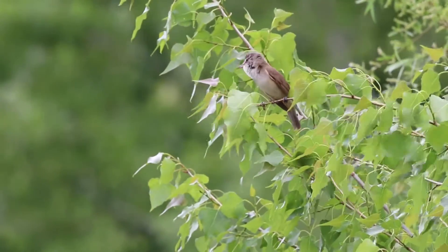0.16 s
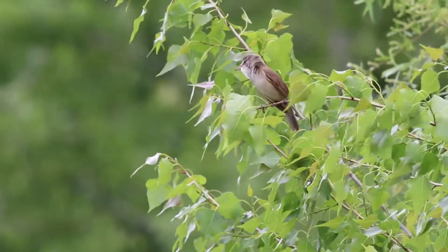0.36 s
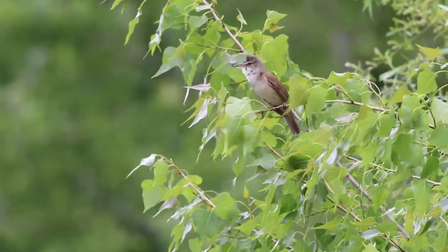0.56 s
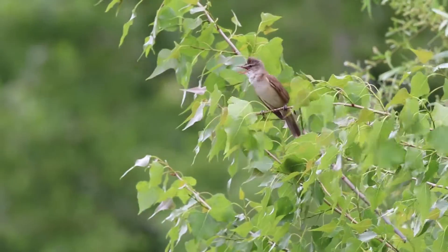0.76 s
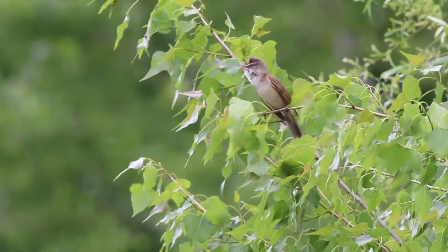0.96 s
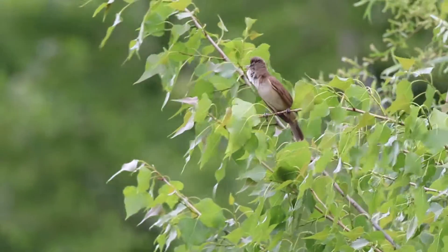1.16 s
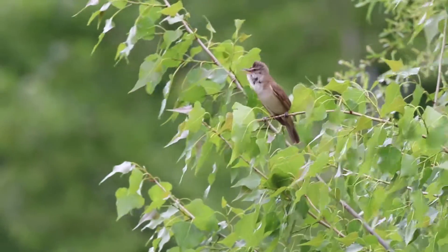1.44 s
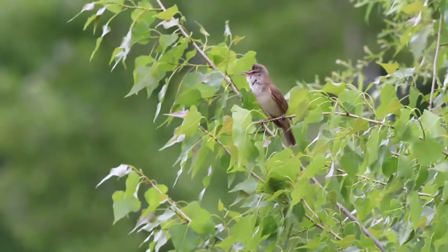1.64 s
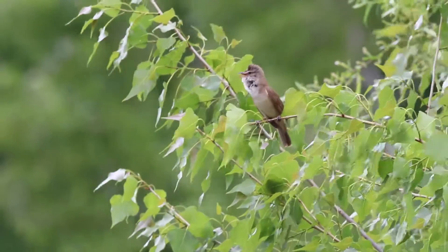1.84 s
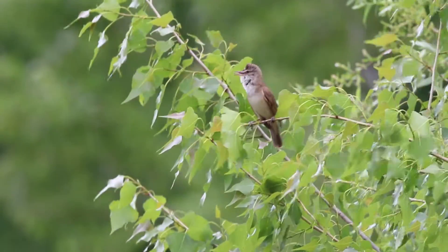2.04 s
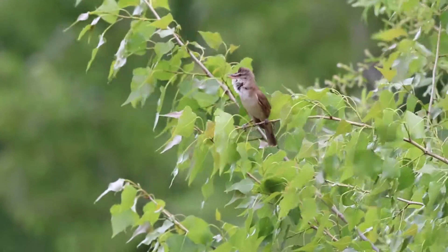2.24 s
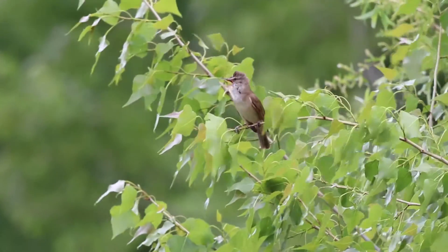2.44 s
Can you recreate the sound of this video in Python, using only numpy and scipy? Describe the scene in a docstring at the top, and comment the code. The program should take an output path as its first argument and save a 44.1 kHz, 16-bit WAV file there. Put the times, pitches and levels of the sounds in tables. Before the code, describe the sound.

A warbler sings harsh, buzzy, chattering notes from a leafy branch while wind buffets the microphone

```python
"""Reed warbler in the wind

A reed warbler on a branch a few metres away sings twelve harsh notes, each a quick run of buzzy gliding tones.
Small birds whistle far off as plain sines, and the leaves return a soft echo made of fading noise.
Wind, made of low noise and single pulses, buffets the two microphone ports.
A narrow band of noise drones and throbs on the right, over a faint hiss and a thin high whine."""
import sys
import numpy as np
from scipy import signal
from scipy.fft import rfft, irfft, next_fast_len
from scipy.io import wavfile
from scipy.ndimage import uniform_filter1d

SR = 44100
rng = np.random.default_rng(int(sys.argv[2]) if len(sys.argv) > 2 else 0)


def volts_from_db(level):
    """Convert decibel levels to linear amplitude ratios."""
    exponent = np.asarray(level, float) / 20
    return 10 ** exponent


def master(y):
    """Save y as 16-bit WAV."""
    cut = np.clip(np.atleast_2d(y).T, -1, 1)
    pcm = np.round(cut * 32767)  # scale
    wavfile.write(sys.argv[1], SR, pcm.astype(np.int16))


N = 114219  # length in samples, about 2.6 s


def colour(x, table):
    """Make some pitches louder and others softer, following points of f/Hz and level/dB."""
    hz, db = np.array(table, float).T
    size = next_fast_len(x.shape[-1])
    f = np.maximum(np.arange(size // 2 + 1) * SR / size, 1)
    gain = volts_from_db(np.interp(np.log(f), np.log(hz), db))
    return irfft(rfft(x, size) * gain, size)[..., :x.shape[-1]]


def unit(x):
    """Scale to an rms (average strength) of 1."""
    return x / np.sqrt(np.mean(x ** 2, axis=-1, keepdims=True))


def walk(rate):
    """A random wandering curve of rms 1: levels held for 1 / rate seconds, then smoothed twice."""
    hold = int(SR / rate)
    steps = np.repeat(rng.standard_normal(N // 10), hold)[:N]
    return unit(uniform_filter1d(uniform_filter1d(steps, hold), hold))


def pan(x, db):
    """Spread one sound over two channels, the left louder than the right by db."""
    left_gain = volts_from_db(db / 2 + 0 * x)
    right_gain = volts_from_db(-db / 2 + 0 * x)
    return x * np.array([left_gain, right_gain])


def pair(table, alike):
    """Two coloured noises, left and right, that have a share `alike` of their power in common."""
    common, left, right = unit(colour(rng.standard_normal((3, N)), table))
    alike = np.clip(alike, 0, 1)
    return np.sqrt(alike) * common + np.sqrt(1 - alike) * np.array([left, right])


def add(out, s, x):
    """Mix x into out from time s in seconds."""
    i = int(s * SR)
    n = min(x.shape[-1], N - i)
    out[..., i:i + n] += x[..., :n]


def glide(ms, hz0, hz1, edge_ms):
    """Phase and soft-edged envelope of a short glide; it is ms long between its half-height points."""
    total_ms = ms + 2 * edge_ms
    t = np.arange(int(total_ms * SR / 1000)) * 1000 / SR
    env = np.sin(np.pi / 2 * np.clip(np.minimum(t, total_ms - t) / (2 * edge_ms), 0, 1)) ** 2
    hz = hz1 + (hz0 - hz1) * np.cos(np.linspace(0, np.pi / 2, len(t))) ** 2  # holds, slides, holds
    return 2 * np.pi * np.cumsum(hz) / SR, env


def whistle(s, hz, db):
    """A sine whose pitch and level follow curve points; returns its start time and its sound."""
    t = np.arange(s[0], s[-1], 1 / SR)
    fade = np.clip(np.minimum(t - s[0], s[-1] - t) / .004, 0, 1)
    pitch = uniform_filter1d(np.interp(t, s, hz), size=SR // 200)  # corners rounded over 5 ms
    tone = np.sin(2 * np.pi * np.cumsum(pitch) / SR)
    return s[0], np.sqrt(2) * fade * volts_from_db(np.interp(t, s, db)) * tone


def warbler():
    """Gliding tones chopped by an uneven buzz and by breath, with a broad rasp, through the throat."""
    # bursts of the notes: t/s, length/ms, level/dB before the throat, first f/Hz, last f/Hz, buzz depth
    bursts = [(0.274, 3.9, -40.5, 3000, 2700, 0.5), (0.2849, 6.2, -37, 2280, 2610, 0.99),
              (0.297, 4.5, -39, 2370, 2600, 2), (0.3071, 4.9, -34.5, 2350, 2700, 0.79),
              (0.318, 3.7, -37, 2390, 2070, 0.73), (0.595, 6.7, -41.5, 2900, 2460, 0.64),
              (0.6075, 3.2, -32, 2200, 2320, 0.68), (0.6105, 4.7, -36, 2740, 2920, 0.41),
              (0.618, 6.6, -37.5, 3210, 2680, 0.42), (0.629, 3.5, -30, 2140, 2280, 0.39),
              (0.6318, 3.1, -29, 2810, 2430, 0.49), (0.6401, 5.9, -39.5, 2345, 1980, 0.78),
              (0.6486, 7.3, -51, 2670, 1920, 1.3), (0.816, 10.5, -48.5, 2150, 2090, 0.7),
              (0.8267, 11.4, -45, 2300, 2193, 0.91), (0.837, 12, -51, 2680, 2830, 0.23),
              (0.8423, 9.2, -51, 2500, 2770, 0.63), (0.8505, 7.6, -43, 2330, 1980, 0.99),
              (0.86, 10, -51, 2500, 2900, 0.65), (1.051, 5.1, -41.5, 2260, 2320, 0.63),
              (1.057, 8.5, -50, 2740, 2980, 0.41), (1.07, 8.2, -45, 2350, 2220, 0.46),
              (1.08, 6.8, -42.5, 2260, 2190, 0.76), (1.173, 4.5, -41, 2940, 2820, 0.83),
              (1.1793, 3.2, -34, 2770, 2580, 0.39), (1.1853, 14, -35, 2860, 2360, 0.47),
              (1.1996, 6.9, -35, 2537, 2000, 0.72), (1.208, 1.7, -34.5, 2670, 2740, 0.61),
              (1.2141, 4.5, -43.5, 2140, 2260, 0.93), (1.2254, 5.4, -37, 2210, 2580, 0.57),
              (1.235, 4, -45, 2300, 2260, 0.63), (1.3153, 3.4, -37, 2630, 2800, 0.82),
              (1.3223, 4.4, -34.5, 3060, 2700, 0.8), (1.3285, 5.6, -30.5, 3170, 2660, 0.3),
              (1.334, 6, -32, 2560, 2660, 0.34), (1.3405, 3.4, -39, 3180, 3270, 0.29),
              (1.345, 8.3, -35, 2460, 2050, 1.06), (1.35, 1.9, -37, 2570, 2700, 0.66),
              (1.3576, 4.1, -44, 2240, 2280, 1.1), (1.363, 6.2, -49, 2670, 2470, 0.5),
              (1.366, 7.7, -41.5, 2385, 2680, 0.52), (1.5373, 3, -37, 2620, 2730, 0.67),
              (1.5445, 11, -30, 2864, 2770, 0.48), (1.557, 5.8, -31, 2580, 2350, 0.24),
              (1.5628, 11.5, -34, 2577, 2015, 0.86), (1.573, 4.4, -46, 2670, 2860, 0.68),
              (1.578, 2.5, -33.5, 2960, 2710, 0.24), (1.6724, 3.5, -36, 3330, 3070, 1.6),
              (1.6794, 3, -29.5, 3000, 2800, 0.94), (1.6856, 12.6, -28, 3370, 2470, 0.47),
              (1.7019, 9.8, -33.5, 2343, 2640, 1.2), (1.708, 2.8, -28.5, 2484, 2600, 1.1),
              (1.7127, 7.1, -47, 3080, 3220, 0.46), (1.7265, 6.2, -44, 2350, 1680, 1.1),
              (1.888, 3.2, -32, 3200, 2800, 0.52), (1.8949, 3.8, -26.5, 3040, 2740, 1),
              (1.9008, 12, -27, 3286, 2360, 0.21), (1.9153, 7, -32.5, 2096, 2510, 0.41),
              (1.922, 2.4, -27.5, 2500, 2460, 0.52), (1.93, 4.1, -38, 2710, 2910, 1),
              (1.934, 3.7, -45, 2790, 3060, 0.37), (1.94, 7.1, -32, 2250, 2630, 0.58),
              (1.9483, 4, -38, 2500, 2140, 0.23), (1.961, 3.9, -62, 2250, 2300, 0.4),
              (2.0237, 2, -37, 3030, 2840, 0.58), (2.0317, 2.6, -26, 3210, 2940, 0.45),
              (2.0363, 15.7, -27, 3145, 2330, 0.41), (2.0542, 7.9, -34.5, 2240, 2640, 0.43),
              (2.0663, 6.4, -44, 3250, 2690, 0.23), (2.0777, 6.2, -40, 2085, 2380, 0.57),
              (2.2736, 3.5, -32, 2950, 3180, 0.66), (2.28, 5.4, -29, 2900, 2790, 0.76),
              (2.2867, 12.5, -24.5, 3050, 2260, 0.2), (2.3022, 9.6, -30, 2206, 2790, 0.57),
              (2.316, 2.1, -31, 2310, 2300, 0.84), (2.317, 2.9, -36, 2970, 2610, 1.1),
              (2.3263, 10, -32.5, 2510, 2530, 0.58), (2.339, 3.5, -40, 2330, 2200, 0.3),
              (2.411, 2.5, -38, 3840, 4070, 0.49), (2.419, 2.1, -26, 3220, 3260, 0.8),
              (2.425, 11.9, -26.5, 3344, 2360, 0.35), (2.4407, 9.9, -33.5, 2256, 1870, 1.2),
              (2.4519, 8.7, -59, 2700, 2110, 2.7), (2.4621, 11.5, -41, 2070, 2260, 1.4)]
    # partials beside the main tone: multiple of its pitch, level/dB in a burst of reference_db
    overtones = [(.5, -22.5), (2, -28.5), (3, -27.5), (4, -26)]
    # tone colour of the throat: f/Hz, level/dB
    throat = [(900, -9), (1400, -2.5), (2200, -2.5), (3200, -0.5), (4100, 3), (4700, -1), (5300, -3.5),
              (6500, -5), (12600, -14), (14000, -31)]
    buzz_hz, buzz_jitter, buzz_sharp = 530, .16, 1.0  # second oscillator that chops the tone
    buzz_on_level, buzz_on_phase = .65, .75  # the buzz shakes the level, a faster wander the pitch
    breath_db, rasp_db, edge_ms = -6, -21, 1.1
    overtone_per_db, reference_db = 1.4, -28  # softer bursts are purer
    beak_hz, beak_db = 3990, 11.5  # the rasp peaks in the open beak
    near_ms, near_db = 1.9, -7  # a close reflection steps the glides
    lump_db, lump_rate = 1.8, 260  # uneven pressure inside a burst

    out = np.zeros(N)
    wobbly_hz = buzz_hz * (1 + buzz_jitter * walk(300))
    chop = np.exp(buzz_sharp * np.cos(2 * np.pi * np.cumsum(wobbly_hz) / SR))
    rough = unit(unit(chop - chop.mean()) + volts_from_db(breath_db) * walk(3400))
    shake = walk(2400)
    chopped_noise = rng.standard_normal(N) * unit(chop)
    rasp = colour(chopped_noise, [(beak_hz / 2, 0), (beak_hz, beak_db), (beak_hz * 1.2, 0)])
    for s, ms, db, hz0, hz1, buzz in bursts:
        phase, env = glide(ms, hz0, hz1, edge_ms)
        i = slice(int(s * SR), int(s * SR) + len(phase))
        phase = phase + buzz_on_phase * buzz * shake[i]
        tone = np.sin(phase)
        for multiple, overtone_db in overtones:
            tone = tone + volts_from_db(overtone_db + overtone_per_db * (db - reference_db)) * np.sin(multiple * phase)
        voice = tone * (1 + buzz_on_level * buzz * rough[i]) + volts_from_db(rasp_db) * rasp[i]
        add(out, s - edge_ms / 1000, unit(voice) * env * volts_from_db(db))
    out = out + volts_from_db(near_db) * np.roll(out, int(near_ms * SR / 1000))
    return colour(out * volts_from_db(lump_db * walk(lump_rate)), throat)


def arched_whistles():
    """A distant bird's whistles: sines that rise to a top pitch and fall again."""
    # shape shared by all arches: t/s from the top, pitch ratio to the top, level/dB
    t, ratio, shape_db = np.array([(-.06, .67, -12), (-.04, .83, -8), (-.025, .93, -4), (-.012, .98, -2),
                                   (0, 1, -2), (.012, .965, -3), (.025, .79, 2), (.044, .62, 0),
                                   (.058, .535, -14)]).T
    # each arch: top t/s, top f/Hz, level/dB, left minus right/dB, stretch of the rise, level of the fall/dB
    arches = [(.893, 5190, -65, 18, 1.1, -3), (1.24, 5100, -64, 14, 0.77, 0),
              (1.391, 5270, -61.5, 16, 0.55, -1), (1.582, 5280, -65, 13, 0.24, 0),
              (2.035, 5460, -59, 8, .7, -25)]
    out = np.zeros((2, N))
    for s, hz, db, pan_db, rise, fall_db in arches:
        times = s + t * np.where(t < 0, rise, 1)
        levels = db + shape_db + fall_db * np.clip(t / 0.023, 0, 1)
        start, sound = whistle(times, hz * ratio, levels)
        add(out, start, pan(sound, pan_db))
    return out


def high_warble():
    """A small bird's warble: one sine leaping up and down in pitch."""
    # points on its path: t/s, f/Hz, level/dB
    path = [(0.888, 7170, -68), (0.896, 7160, -67), (0.898, 7060, -65), (0.908, 5523, -56),
            (0.918, 6837, -67), (0.923, 6880, -55), (0.93, 7180, -65), (0.939, 6294, -49.5),
            (0.95, 6908, -59), (0.96, 7420, -46.5), (0.969, 6700, -46), (0.976, 6240, -45),
            (0.982, 6240, -47), (0.992, 6050, -79)]
    out = np.zeros((2, N))
    start, sound = whistle(*np.array(path).T)
    add(out, start, pan(sound, 1.3))
    return out


def peeps():
    """Soft peeps on the left: short gliding sines with a rough level."""
    # each peep: t/s, length/ms, level/dB of a smooth peak at the centre, first f/Hz, last f/Hz, roughness
    peep_list = [(0.333, 36, -50, 2960, 2960, 0.32), (0.384, 55, -62.5, 2990, 2955, 0.58),
                 (.452, 16, -56, 3460, 3740, .3), (0.465, 21.5, -62, 3990, 4420, 0.82),
                 (.533, 11, -51, 2460, 2840, 1.6), (.546, 12, -54, 2970, 3050, 1.5),
                 (.567, 14, -54, 2890, 2920, .7), (2.133, 25, -55, 3010, 2680, 0.9),
                 (2.537, 15, -49.5, 2750, 3400, 0.4), (2.565, 17, -44.5, 3360, 2500, 0.51)]
    out = np.zeros((2, N))
    rough = walk(1200)
    for s, ms, db, hz0, hz1, depth in peep_list:
        phase, env = glide(ms, hz0, hz1, 2.8)
        rough_part = rough[int(s * SR):].take(np.arange(len(phase)), mode="wrap")
        sound = volts_from_db(db) * env * np.sin(phase) * (1 + depth * rough_part)
        add(out, s, pan(sound, 11))
    return out


def far_birds():
    """Arched whistles, one high warble and soft peeps, all fluttering with distance."""
    return (arched_whistles() + high_warble() + peeps()) * volts_from_db(2.0 * walk(150))


def leaves(x):
    """Scattered echo: noise with a short and a long fading tail, different on each side."""
    t = np.arange(SR) / SR

    def tail(t60):
        """A fade of 60 dB in t60 seconds, scaled so that its length does not change its strength."""
        return np.exp(-np.log(1000) * t / t60) * np.sqrt(2 * np.log(1000) / t60 / SR)

    fading = volts_from_db(-12.5) * tail(.12) + volts_from_db(-16.5) * tail(0.43)
    echoes = rng.standard_normal((2, SR)) * fading * (t > .003)  # silent for the first 3 ms
    wet = signal.fftconvolve(x, echoes, axes=1)[:, :N]
    return colour(wet, [(1200, 6.5), (2500, 2), (3500, 3), (5000, 0.5), (9000, 7)])


def turbulence():
    """Low noise whose level flutters and which the two ports hear partly alike."""
    # path of the wind: t/s, level/dB before the splitting below, left minus right/dB before the shares below
    gusts = [(0.0, -25, -0.5), (0.23, -23.5, -4.5), (0.29, -26, -1), (0.459, -21, -5), (0.52, -32.5, -4),
             (0.549, -23.5, -6.5), (0.64, -33.5, -4), (0.71, -33, -6.5), (0.79, -26, -8),
             (0.84, -32.5, -9.5), (0.92, -23.5, -10), (1.01, -39, -8.5), (1.05, -32, -17),
             (1.12, -28.5, -9), (1.3, -27, -11.5), (1.33, -33, -2), (1.4, -27.5, -13.5), (1.59, -33, -11.5),
             (1.62, -28.5, -16), (1.67, -30.5, -13.5), (1.689, -29.5, -16), (1.74, -37, -13),
             (1.781, -39.5, 5), (1.86, -40.5, -25), (1.89, -27, -14), (1.94, -43.5, -17), (2.03, -42, -25),
             (2.07, -45, -6), (2.21, -37.5, -11), (2.28, -35, -17), (2.33, -42.5, -16), (2.368, -34, -16.5),
             (2.41, -39.5, -10), (2.51, -32, -14), (2.55, -46, -9), (2.59, -30, -5)]
    # tone colour of the noise: f/Hz, level/dB
    wind_colour = [(15, -13), (40, 1.5), (90, 3), (160, 0), (300, -12.5), (500, -25), (900, -47),
                   (2000, -29), (6000, -120)]
    # the unshared part is brighter: f/Hz, level/dB
    own_tilt = [(30, -14), (100, -3), (300, 5)]
    gust_db, gust_rate = 3, 45
    share_top, share_per_db = .96, .028  # the ports agree most when equally hit
    bright_per_db, bright_at_db = 1, -22  # strong gusts reach higher
    low_pan, high_pan = 0.83, 1.28  # shares of the pan: the bass reaches both ports more evenly

    s, level, balance = np.array(gusts).T
    t = np.arange(N) / SR
    db = np.interp(t, s, level)
    pan_db = np.interp(t, s, balance)
    share = np.clip(share_top - share_per_db * abs(pan_db), 0, 1)
    both, left, right = colour(rng.standard_normal((3, N)), wind_colour)
    shared = unit(both) * volts_from_db(1.5 * walk(26.07))
    own = unit(colour(np.array([left, right]), own_tilt)) * volts_from_db(gust_db * walk(gust_rate))
    air = unit(np.sqrt(share) * shared + np.sqrt(1 - share) * own)
    low = colour(air, [(90, 0), (220, -9.5)]) * pan(np.ones(N), low_pan * pan_db)
    high = colour(air, [(90, -23.5), (220, -2)]) * volts_from_db(2.0 * walk(30.16))
    high = high * pan(volts_from_db(bright_per_db * (db - bright_at_db)), high_pan * pan_db)
    return (low + high) * volts_from_db(db)


def buffets():
    """Single hard pushes of wind: a sine of a few cycles under a rounded hump."""
    # each push: t/s (it begins 1.9 ms later), level/dB (lowered by 4 below), f/Hz, left minus right/dB
    thumps = [(0.193, -11, 163, -2), (0.561, -18.5, 186, -6), (0.91, -26, 95, 6), (1.045, -13.5, 135, -9),
              (1.408, -20.5, 80, -17), (1.466, -15.5, 220, -20.5), (1.618, -16, 237, -17),
              (1.685, -14, 103, -22.5), (1.688, -14, 306, -25.5), (1.885, -18, 73, -15),
              (2.271, -21, 58.3, -19)]
    peak_cycles = 0.78  # the hump is highest after this many cycles
    out = np.zeros((2, N))
    for s, db, hz, pan_db in thumps:
        cycles = np.arange(int(3 * peak_cycles * SR / hz)) * hz / SR
        hump = np.exp(-(cycles / peak_cycles - 1) ** 2 * 3)
        add(out, s + 0.0019, pan(volts_from_db(db - 4) * np.sin(2 * np.pi * cycles) * hump, pan_db))
    return out


def wind():
    """Turbulence and buffets at the ports, with the very deep and the high pitches cut."""
    # limits of the wind's pitch range: f/Hz, level/dB
    limits = [(22, -7), (40, 0), (900, 0), (2500, -80)]
    return colour(turbulence() + buffets(), limits)


def drone():
    """A narrow band of noise on the right that throbs at random, nearly alike on both sides."""
    # shape of the band: f/Hz, level/dB
    band = [(600, -14), (650, -11.5), (700, 4.5), (740, 0), (780, 1), (840, -6), (890, -19.5), (950, -42)]
    # extra cut outside the band: f/Hz, level/dB
    edges = [(300, -60), (560, 0), (1000, 0), (2000, -70)]
    level_db, throb_db, pan_db = -42.5, 2.5, -8
    throb = volts_from_db(level_db + throb_db * walk(24.02))
    return colour(pair(band, 0.95), edges) * pan(throb, pan_db)


def hiss():
    """Broad noise, almost unrelated on the two sides."""
    # tone colour of the noise: f/Hz, level/dB per Hz (relative)
    spectrum = [(20, -25), (60, -3.5), (120, -14.5), (270, -26.5), (400, -9), (600, -18.5), (1000, -25),
                (1160, -26), (1280, -18.5), (1380, -25), (1700, -30.5), (2600, -27), (3300, -34),
                (4100, -37.5), (4950, -42), (8900, -42.5), (14200, -52), (16000, -46)]
    # the left port hisses brighter: f/Hz, level/dB
    left_tilt = [(5000, 0.5), (14000, 1)]
    left, right = volts_from_db(-41) * pair(spectrum, 0.048)
    return np.array([colour(left, left_tilt), right])


def whine():
    """A thin, very high sine whose phase wanders a little."""
    phase = 2 * np.pi * 15636 * np.arange(N) / SR + .6 * walk(8)
    return pan(volts_from_db(-74) * np.sin(phase), 5.1)


def background():
    """The drone, the hiss and the whine together."""
    return drone() + hiss() + whine()


def scene():
    """All sources at the microphone; only the birds are echoed by the leaves."""
    birds = pan(warbler(), -1.5) + far_birds()
    return birds + leaves(birds) + wind() + background()


def roll_off(x):
    """The treble ends steeply here."""
    return signal.sosfilt(signal.butter(12, 15690, fs=SR, output="sos"), x)


def record(dry):
    """Finish the mix: cut it steeply above 15.75 kHz, just above the whine."""
    # low-pass filter: f/Hz, level/dB
    top_cut = [(15750, 0), (15950, -60)]
    finished = colour(dry, top_cut)
    return roll_off(finished)


dry = scene()
out = record(dry)
master(out)
```